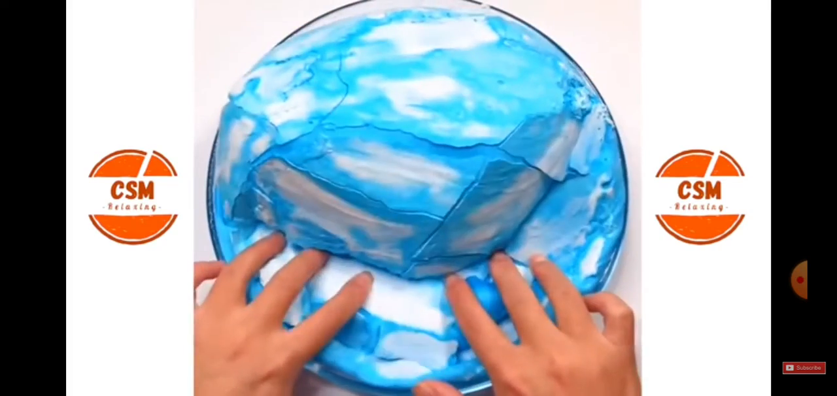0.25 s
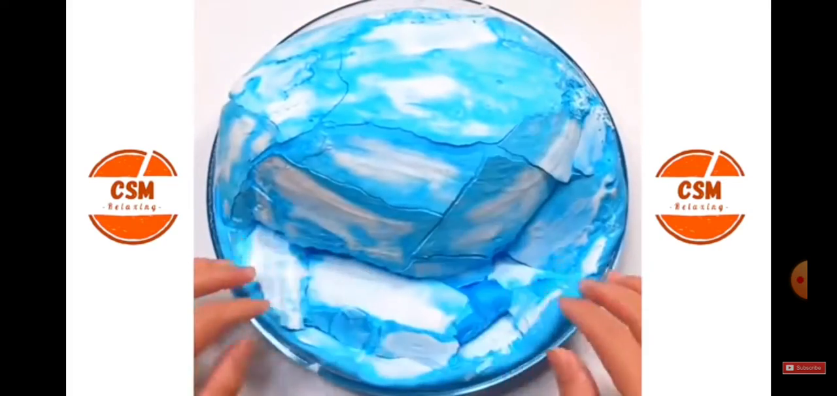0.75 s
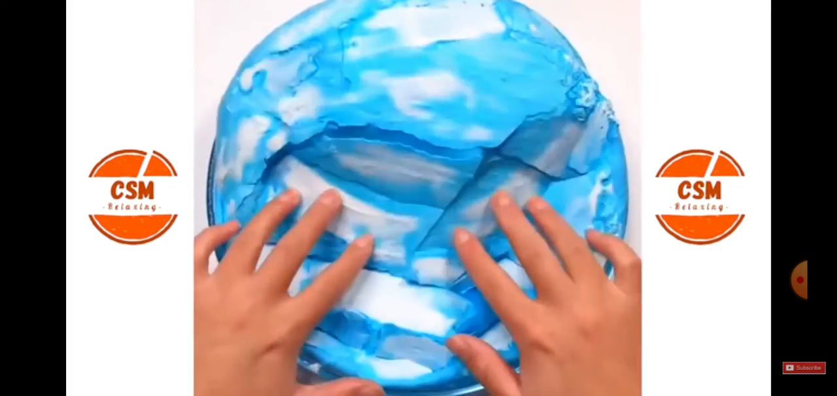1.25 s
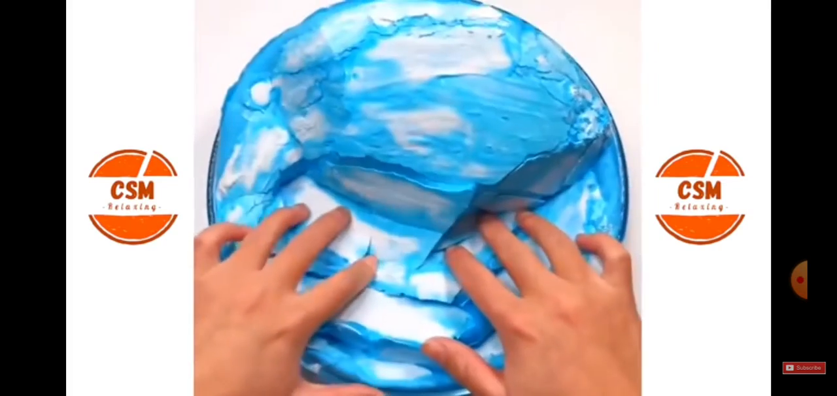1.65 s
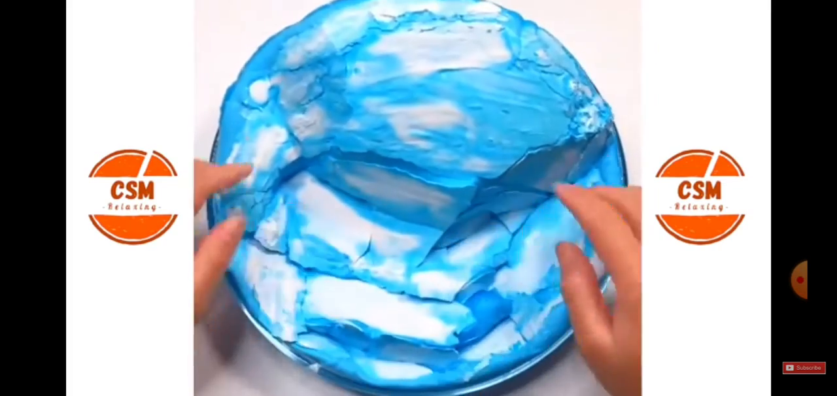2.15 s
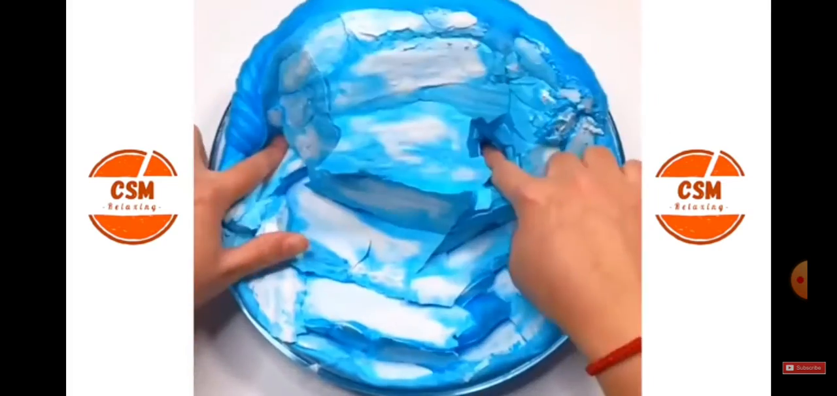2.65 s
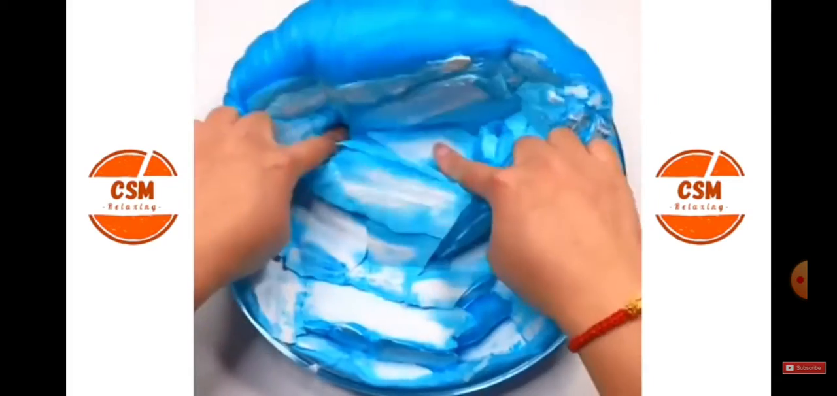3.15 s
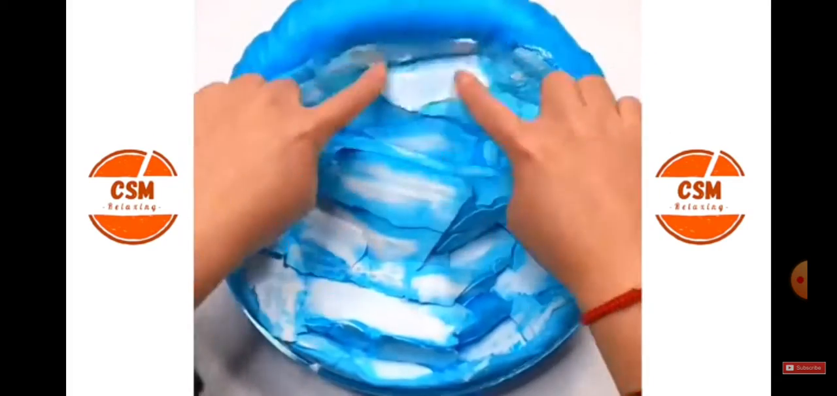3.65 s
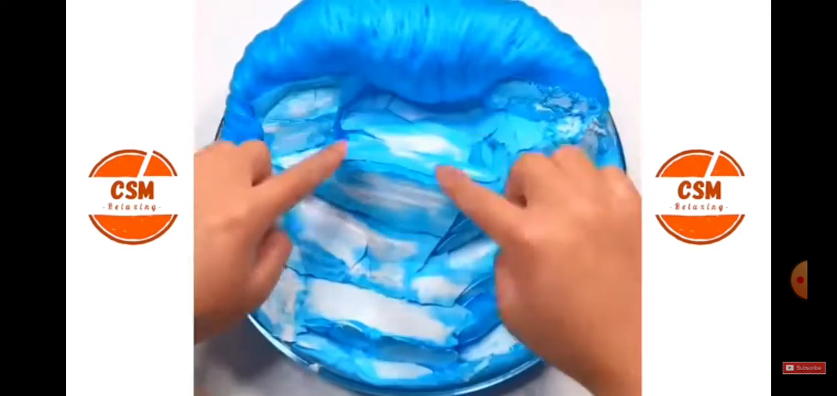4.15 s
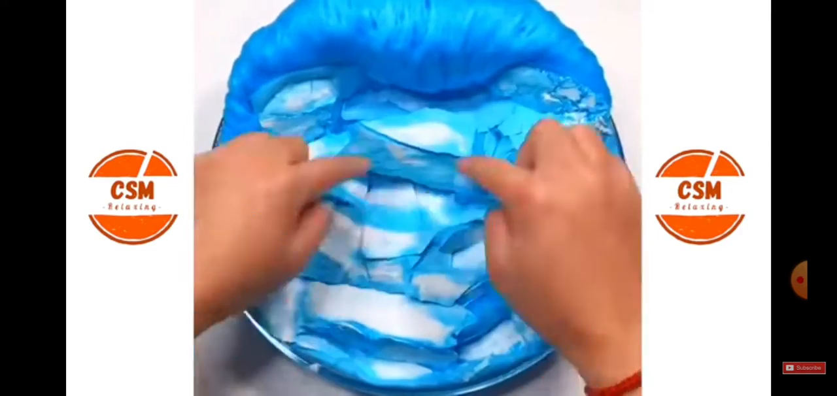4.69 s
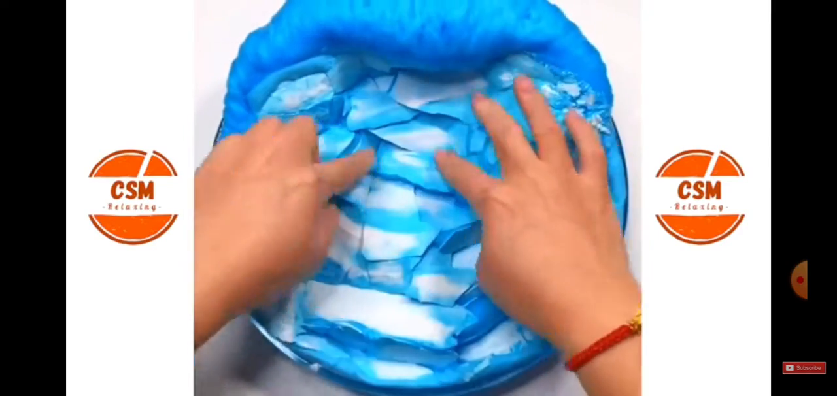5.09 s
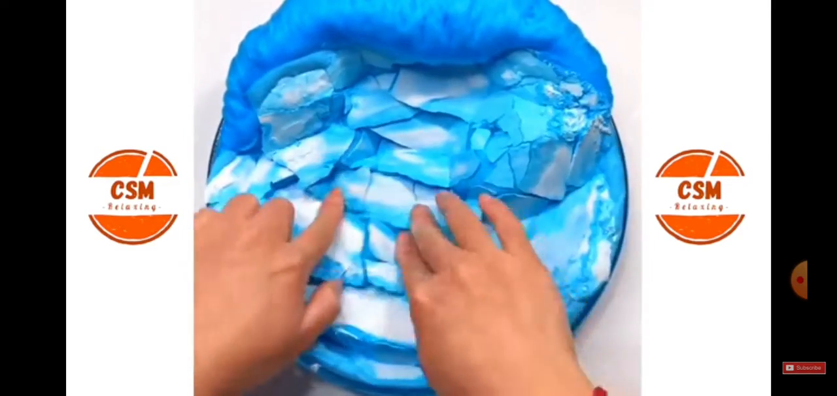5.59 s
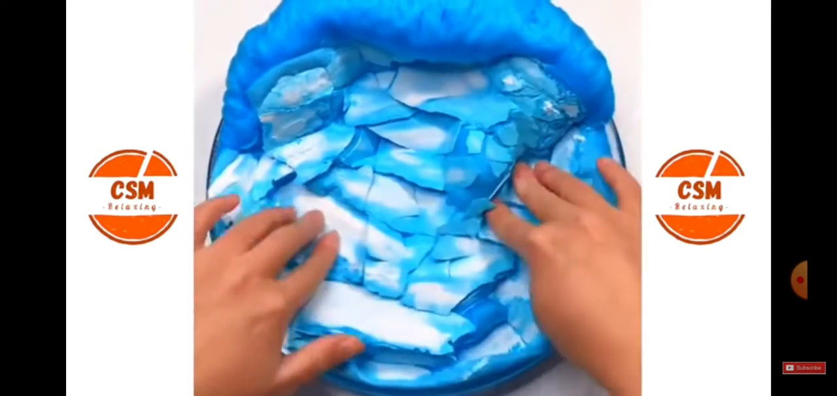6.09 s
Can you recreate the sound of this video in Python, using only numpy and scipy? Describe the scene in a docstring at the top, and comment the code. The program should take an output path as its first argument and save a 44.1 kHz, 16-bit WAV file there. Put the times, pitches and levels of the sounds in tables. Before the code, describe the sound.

Hands knead a bowl of crusted slime very close to the microphone. A dense flurry of snaps opens it, then calmer gaps with isolated squishes. From about 1.4 seconds crunchy clusters of pops return, thickening after three seconds. Each press brings a wet fizz of tiny bubbles and occasional hollow plops. The bowl rings faintly in a small room with low hum.

```python
"""Air pockets burst through crusted slime as fingers press and knead a bowl of it, close up in a small room.
Each pop is a tone that dives steeply from a snap to a hollow note; deep pockets give only round plops.
Every squeeze also crushes thousands of tiny bubbles, random grains summed into a fizz.
The bowl and the room ring along; filtered-noise air and rumble and a faint, wavering hum lie below.
A limiter holds the peaks."""
import sys
import numpy as np
from scipy import signal
from scipy.fft import rfft, irfft, next_fast_len
from scipy.io import wavfile
from scipy.ndimage import uniform_filter1d, minimum_filter1d

SR = 44100
rng = np.random.default_rng(int(sys.argv[2]) if len(sys.argv) > 2 else 0)


def int16_out(signal):
    """Quantize to a 16-bit WAV file."""
    q = np.round(np.clip(np.atleast_2d(signal).T, -1, 1) * 32767)
    wavfile.write(sys.argv[1], SR, q.astype(np.int16))


N = 279153
TIME = np.arange(N) / SR

# the loudest air pockets, before the trims in pops():
# [t/s, body level/dB, snap re body/dB, hollow tail re body/dB]
POCKETS = [(0.0177, -17, 5, -13), (0.0488, -12.5, -3, -26), (0.0638, -22, 6, -22), (0.0832, -6.5, 2, -12),
           (0.1121, -16, 2, -20), (0.1269, -11.5, 3, -17), (0.1569, -14.5, 3, -5), (0.1689, -12.5, -4, -4),
           (0.1768, -9, 14, -17), (0.2029, -20.5, 16, -1), (0.3153, -20.5, -9.5, -26),
           (0.3755, -20.5, -2, -10), (0.39, -15, 1, -9), (0.4225, -19.5, 1, -3), (0.487, -15.5, -8, -7),
           (0.7844, -19.5, 6, -5), (1.1952, -26, -12.5, 0.5), (1.3247, -13, 0.5, 3),
           (1.4235, -20, 11.5, -4), (1.4415, -7.5, -18, -24), (1.4578, -9.5, -13, -11),
           (1.5171, -9, -16, -13), (1.5444, -2.5, 4, -21), (1.5658, -13, -1.5, -11), (1.603, -8.5, 3, -20),
           (1.7627, -23.5, -18, 1.5), (1.788, -8, 1, -5.5), (1.8279, -14.5, 2, -13),
           (1.8406, -12.5, 8.5, -2.5), (2.2229, -10.5, -15, -8), (2.2848, -14.5, -3.5, -27),
           (2.3828, -33.5, 4.5, -3), (2.595, -23, 1.5, 6), (2.6224, -23.5, 11, -6.5),
           (2.6364, -13, 1, -11.5), (2.6598, -20, 10, -16.5), (2.6675, -12, -1, -19),
           (2.687, -21.5, 8.5, -4), (2.7398, -13.5, 13, -21), (2.785, -13.5, 1, -10),
           (2.9611, -24.5, -7.5, -1), (3.0022, -13, -22, -21), (3.1998, -20.5, -4.5, 2),
           (3.2287, -9.5, -12.5, -4.5), (3.273, -10, 8, -23), (3.2854, -11, 7, -23), (3.303, -9, 4, -24),
           (3.327, -9.5, -18, -14), (3.4687, -13, -2, -4.5), (3.5747, -13, -31, -27),
           (3.6181, -13, 5, -3.5), (3.813, -8, -7.5, -18), (3.8917, -9, -4, -8), (3.912, -13.5, -29, -13.5),
           (3.919, -10.5, 5, -20), (3.9266, -12.5, 5, -8), (3.9845, -14.5, -16, -24.5),
           (4.023, -10.5, 8, -7.5), (4.4651, -14.5, -12, -3), (4.5434, -10.5, -5, -28),
           (4.5917, -7, 6, -16), (4.9462, -8.5, -8.5, -9.5), (4.9919, -10.5, 2, -5),
           (5.0165, -13, -0.5, -22), (5.0387, -10, -9, -13), (5.059, -8.5, -7, -11), (5.0839, -6, 3, -22),
           (5.0896, -15, -3, -11), (5.1339, -10.5, 6, -4), (5.5565, -9, -11, -12), (5.5747, -9.5, -4.5, -2),
           (5.6151, -10, -2, -12), (5.6574, -8, -0.5, -16), (5.859, -14, -5.5, -8), (6.1014, -8, -10, -13),
           (6.1459, -14, 14, -1), (6.1837, -11, 12, -4), (6.2358, -19.5, 5.5, -5)]
# deep pockets squeezed open: [t/s, level before trim/dB, pitch near the top of the swell f/Hz]
DEEP_POCKETS = [(0.43, -23.5, 453), (0.535, -31.5, 424), (0.689, -26, 404), (0.798, -26, 412),
                (1.472, -21.5, 299), (2.172, -32, 416.5), (2.236, -20.5, 372), (2.579, -28, 466),
                (2.597, -20.5, 342), (2.999, -19.5, 564), (3.043, -25, 362.2), (3.237, -20, 325),
                (3.277, -31, 350), (3.792, -19.5, 357.7), (4.238, -27, 374.5), (4.424, -23, 394.5),
                (4.461, -23, 377), (5.884, -26, 422), (6.062, -19.5, 423.7)]
# finger presses, levels before the trims in fizz():
# [t at full force/s, attack/s, hold/s, release/s, fizz level/dB, crispness re body/dB]
FINGER_PRESSES = [(0.01, 0.021, 0.031, 0.021, -23, -0.5), (0.066, .02, .12, 0.061, -26.5, -5.5),
                  (0.392, 0.024, 0.098, 0.093, -37, -6.5), (0.765, 0.019, 0.056, 0.033, -30.5, -0.5),
                  (1.328, 0.013, 0.08, .03, -36.5, -1.5), (1.405, .02, .012, 0.016, -26.5, 0.5),
                  (1.459, 0.023, 0.068, 0.019, -23.5, -2.5), (1.602, 0.024, 0.0497, .06, -28, -2),
                  (1.811, 0.019, 0.057, 0.066, -34, -2), (1.916, 0.0074, 0.0092, .015, -33, -13),
                  (2.217, .026, 0.022, 0.037, -24, -7), (2.467, 0.027, 0.023, 0.029, -44, 0.5),
                  (2.629, 0.026, 0.078, 0.032, -28.5, -1), (2.729, 0.021, .08, .033, -30.5, -9),
                  (3.006, 0.011, 0.0434, 0.016, -25, 2), (3.231, 0.0081, .03, 0.022, -25, -7),
                  (3.288, 0.0073, .025, 0.0298, -21.5, -1), (3.351, .02, 0.017, 0.114, -32, -3.5),
                  (3.605, .012, 0.0199, 0.018, -23.5, 0.5), (3.823, .016, .095, .012, -22.5, -2.5),
                  (3.948, 0.017, .04, 0.096, -30.5, -6.5), (4.187, 0.017, 0.043, .014, -27.5, -1.5),
                  (4.465, .016, .05, 0.035, -24, -4.5), (4.588, .02, 0.057, 0.033, -27, -4),
                  (4.819, 0.0085, .025, 0.015, -25, -3), (4.954, 0.0051, 0.022, 0.021, -33.5, -8),
                  (5.026, 0.011, .11, 0.044, -28, -5.5), (5.266, 0.0081, 0.0342, .014, -24.5, -5.5),
                  (5.56, .022, 0.067, 0.034, -26.5, -4.5), (5.67, .02, 0.027, 0.074, -31, -3.5),
                  (5.867, .018, 0.0184, 0.019, -26, 1), (6.027, 0.0069, 0.061, 0.021, -27.5, -2.5),
                  (6.105, .015, 0.0438, 0.022, -25.5, 0), (6.198, .02, 0.032, 0.049, -29, -3.5)]
# tone curve of the slime at the microphone: [f/Hz, relative level/dB]
SLIME_COLOUR = [(100, -22), (195, -6), (236, -2.5), (380, 4.5), (580, -1), (790, 1.5), (950, 0.5),
                (1500, 5), (2350, 2), (2900, -9.5), (4400, -1), (6700, -5.5), (9800, -31.5), (15500, -27.5)]
# resonances of the bowl: [f/Hz, width/Hz, level added to the direct sound/dB]
BOWL_MODES = [(237.7, 11, -2.5), (330.4, 11, -6), (809.4, 15, -3.5), (1420, 13, -38), (4500, 14, -46)]
# tone curve of the room air: [f/Hz, relative level/dB]
AIR_COLOUR = [(22, -40), (45, -3), (70, -22), (140, 9), (220, -7.5), (380, -13), (800, -8), (1800, 2),
              (2900, -9.5), (4300, -2), (6300, -9.5), (9500, -51), (16000, -56)]
# rumble of the bowl under the hands: [t/s, level/dB]
RUMBLE_LEVEL = [(0, -79), (1.2, -82), (1.5, -49.5), (2.1, -72), (2.7, -56.5), (3.4, -54), (4.2, -64),
                (6.3, -76)]
# hum tones: [f/Hz, level around which it wavers/dB]
HUM_TONES = [(100.8, -54.5), (71, -66)]

SQUELCH_HZ, CRISP_HZ = 700, 2900  # splits between hollow lows, body and crisp highs
TOP_HZ = 16000  # upper limit of the finished sound
GLIDE_MS, GLIDE_SPREAD = 0.23, 0.1935  # how fast a pocket's pitch dives; its scatter (natural log)
STRAY_PER_S, STRAY_OVER_DB = 14, 7.5  # lesser pockets under a firm press: rate, level above the fizz
STRAY_SNAP_DB, STRAY_TAIL_DB, STRAY_SPREAD_DB = -4, -7, 2.5  # spread is either way
FIRM_DB = -28  # fizz level of a firm press
SQUELCH_DB, DRAIN_DB, DRAIN_S = -3, -6.5, 0.046  # lows as a finger lands; how far and fast they drain
# the foam settling by itself: body, its drift, highs and lows re body
REST_DB, REST_WANDER_DB, REST_CRISP_DB, REST_SQUELCH_DB = -53, 3, 1, 7


def undb(db):
    """Decibels to gain."""
    return 10 ** (np.asarray(db) / 20)


def unit(x):
    """Scale to rms 1."""
    return x / np.sqrt(np.mean(x ** 2) + 1e-18)


def walk(rate):
    """Random drift with a spread near 1: straight lines between random points, rate per second."""
    knots = rng.standard_normal(int(N / SR * rate) + 2)
    return np.interp(TIME * rate, np.arange(len(knots)), knots)


def colour(x, points):
    """Minimum-phase (causal) filter that follows (Hz, dB) points."""
    hz, db = np.transpose(points)
    size = next_fast_len(2 * len(x))
    grid = np.arange(size // 2 + 1) * SR / size
    curve_db = np.interp(np.log(grid + 1), np.log(hz), db)
    cepstrum = irfft(np.log(undb(curve_db)), size)
    # folding the cepstrum forward in time makes the filter causal
    cepstrum[1:size // 2] *= 2
    cepstrum[size // 2 + 1:] = 0
    return irfft(rfft(x, size) * np.exp(rfft(cepstrum)), size)[:len(x)]


def lowpass(x, hz):
    """Zero-phase low-pass."""
    return signal.sosfiltfilt(signal.butter(4, hz, fs=SR, output="sos"), x, padtype=None)


def registers(x):
    """Split into hollow lows, body and crisp highs, which sum to the whole."""
    low = lowpass(x, SQUELCH_HZ)
    upto = lowpass(x, CRISP_HZ)
    return low, upto - low, x - upto


def burst(glide_ms, ring_ms, start_hz=7000, sag=.85, fade=0.84, overtone=0.35, tear=0.23, tear_ms=10.0):
    """One bubble: its skin tears and slackens, so the pitch dives from a snap to a hollow note."""
    ms = np.arange(2 ** 11) / SR * 10 ** 3
    slack = 1 + ms / glide_ms
    turns = np.cumsum(start_hz * slack ** -sag + 70 * rng.random()) / SR
    skin = np.sin(2 * np.pi * turns)
    upper = overtone * np.sin(2 * np.pi * turns * (2 + rng.random())) * np.exp(-ms / 9.3)
    rip = tear * rng.standard_normal(len(ms)) * np.exp(-ms / tear_ms)
    onset = 1 - np.exp(-ms / 0.066)
    return (skin + upper + rip) * slack ** -fade * np.exp(-(ms / ring_ms) ** 2) * onset


def shreds(wave, count=2, share=.4, within_s=.004):
    """The torn skin snaps again, more weakly, just after the burst."""
    out = wave
    for when, size, glide in rng.random((count, 3)):
        lag = int(when * within_s * SR)
        snap = burst(0.0797 + 0.079 * glide, ring_ms=4.2)
        out = out + share * size * np.pad(snap, (lag, 0))[:len(wave)]
    return out


def pocket(wave, count=4, low_hz=900, high_hz=6000, share=1.1, cycles=3):
    """The open cavity rings briefly at a few pitches of its own."""
    t = TIME[:2 ** 9]
    response = 1. * (t == 0)  # the direct sound
    for place in (np.arange(count) + rng.random(count)) / count:
        hz = low_hz * (high_hz / low_hz) ** place
        decay = np.exp(-t * hz / cycles)
        ring = np.cos(2 * np.pi * (hz * t + rng.random()))
        response = response + 2 * share * decay / decay.sum() * ring
    return np.convolve(wave, response)[:len(wave)]


def pops(rows, body_db=-3, snap_db=-3, tail_db=-3, muffle=0.22):
    """Bursting air pockets: random glides, with the body, snap and hollow tail levelled apart."""
    lead, span = 128, 100  # samples: room ahead of the burst; length over which its level counts
    out = np.zeros(N + 2 ** 13)
    for s, db, snap, tail in rows:
        glide_ms = GLIDE_MS * np.exp(GLIDE_SPREAD * rng.standard_normal())
        wave = pocket(shreds(burst(glide_ms, ring_ms=11.4)))
        wave = colour(np.pad(wave, (lead, 0)), SLIME_COLOUR)
        # a pocket buried in the slime has little snap and loses its very top too
        wave = colour(wave, [(4800, 0), (8000, muffle * min(snap, 6))])
        gains = undb(db + np.array([tail + tail_db, body_db, snap + snap_db]))
        parts = registers(wave)
        wave = sum(g * part * np.sqrt(span / np.sum(part ** 2)) for g, part in zip(gains, parts))
        start = max(int(s * SR) - lead, 0)
        out[start:start + len(wave)] += wave
    return out[:N]


def strays(press_db):
    """Lesser pockets give way at random, likelier under a firm press: rows like those of POCKETS."""
    chance = rng.random((int(STRAY_PER_S * N / SR), 5))
    rows = []
    for when, luck, *spread in chance:
        db = press_db[int(when * N)]
        if luck < undb(db - FIRM_DB):
            usual = np.array([db + STRAY_OVER_DB, STRAY_SNAP_DB, STRAY_TAIL_DB])
            varied = usual + STRAY_SPREAD_DB * (2 * np.array(spread) - 1)
            rows.append((when * N / SR, *varied))
    return rows


def plops(swell_s=0.006315, sag=0.29, gain_db=-1):
    """Deep pockets open without a snap: only the round, falling note gets out."""
    t = TIME[:2 ** 11]
    age = t / swell_s
    swell = age * np.exp((1 - age ** 2) / 2)  # peaks at 1 when age is 1
    out = np.zeros(N + len(t))
    for s, db, hz in DEEP_POCKETS:
        turns = np.cumsum(hz * ((age + .5) / 1.45) ** -sag) / SR
        start = int(s * SR)
        out[start:start + len(t)] += undb(db + gain_db) * np.sqrt(2) * swell * np.sin(2 * np.pi * turns)
    return out[:N]


def kneading():
    """Fizz dB of lows, body, highs: a press swells, holds and relaxes, squelching most as it lands."""
    rest = undb(REST_DB + REST_WANDER_DB * walk(12))
    power = (rest * undb([[REST_SQUELCH_DB], [0], [REST_CRISP_DB]])) ** 2
    for s, attack, hold, release, db, crisp in FINGER_PRESSES:
        age = TIME - s
        shape = np.exp(np.minimum(age, 0) / attack - np.maximum(age - hold, 0) / release)
        body = undb(db) * shape
        squelch = SQUELCH_DB + DRAIN_DB * (1 - np.exp(-np.maximum(age, 0) / DRAIN_S))
        power = power + np.array([body * undb(squelch), body, body * undb(crisp)]) ** 2
    return 10 * np.log10(power)


def bursts(rate, spread_db):
    """Random instants at a given rate per second: many small sizes, a few large ones."""
    fired = np.flatnonzero(rng.random(N) < rate / SR)
    size_db = spread_db * np.minimum(rng.exponential(size=len(fired)), 2)
    train = np.zeros(N)
    train[fired] = undb(size_db) * rng.choice([-1, 1], len(fired))
    return train


def ringing(rate, count=28):
    """Closed bubbles, heavily damped by the slime: a few cycles each."""
    t = TIME[:2 ** 10]
    out = np.zeros(N)
    for hz in 600 * 4 ** ((np.arange(count) + rng.random(count)) / count):  # over two octaves
        note = np.sin(2 * np.pi * hz * t) * np.exp(-t * hz / 5)
        out += signal.oaconvolve(bursts(rate / count, 4), unit(note))[:N]
    return out


def folds(x, count=32, patchy_db=7, rate=75):
    """Folds of slime open and close over the foam, so its colour shifts from grain to grain."""
    size = next_fast_len(N)
    place = np.log2(np.arange(size // 2 + 1) * SR / size + 1)
    centres = np.linspace(np.log2(240), np.log2(7500), count)
    spectrum = rfft(x, size)
    # overlapping bands, each with a drifting level
    bands = (irfft(spectrum * np.interp(place, centres, one), size)[:N] for one in np.eye(count))
    return sum(band * undb(patchy_db * np.tanh(walk(rate))) for band in bands)


def fizz(levels, rest_rate=1700, press_rate=300, spread_db=3.5,
         body_db=-1.13, crisp_db=-0.4, squelch_db=-1.42, clump_db=1.28):
    """Tiny bubbles of many sizes; the harder the squeeze, the more of them burst each second."""
    force = undb(levels[1] - levels[1].max())
    rate = rest_rate + press_rate * force
    glides_ms = np.geomspace(.06, .45, num=14)
    torn = np.zeros(N)
    for glide_ms in glides_ms:
        grain = unit(burst(glide_ms, ring_ms=10.3))
        torn += signal.oaconvolve(bursts(rate / len(glides_ms), spread_db), grain)[:N]
    # dividing by the root of the rate leaves the loudness to the levels
    cloud = (unit(torn) + 0.53 * unit(ringing(rate / 5))) / np.sqrt(rate)
    parts = registers(colour(folds(cloud), SLIME_COLOUR))
    trims = (squelch_db, body_db, crisp_db)
    # under pressure the foam gives way in clumps
    clumps = undb(clump_db * np.sqrt(force) * walk(160))
    return clumps * sum(unit(part) * undb(db + trim) for part, db, trim in zip(parts, levels, trims))


def bowl(x):
    """The bowl rings faintly along with everything inside it: resonators beside the direct sound."""
    out = x
    for hz, width, db in BOWL_MODES:
        b, a = signal.iirpeak(hz, hz / width, fs=SR)
        out = out + undb(db) * signal.lfilter(b, a, x)
    return out


def room(x, t60=0.51, wet_db=-10, build_s=0.0011):
    """A small bare room: a short diffuse tail of decaying noise, weak in the bass."""
    t = TIME[:SR // 2]
    tail = rng.standard_normal(len(t)) * undb(-60 * t / t60) * (1 - np.exp(-t / build_s))
    tail = colour(tail, [(150, -9.5), (500, 2), (1500, -6.5), (2800, -4.5),
                         (4500, -7), (9000, -9), (15000, 5.0)])
    tail = tail / np.sqrt(np.sum(tail ** 2))
    return x + undb(wet_db) * signal.fftconvolve(x, tail)[:N]


def background(air_db=-53):
    """Soft room air and the bowl's faint rumble, both filtered noise, over a wavering hum of sines."""
    air = unit(colour(rng.standard_normal(N), AIR_COLOUR)) * undb(air_db + walk(6.6))
    rumble = unit(colour(rng.standard_normal(N), [(22, -30), (30, -14), (42, -5), (90, -10),
                                                  (170, -7), (400, -45), (2000, -80)]))
    rumble_db = np.interp(TIME, *np.transpose(RUMBLE_LEVEL))
    hum = np.zeros(N)
    for hz, db in HUM_TONES:
        tone = np.sin(2 * np.pi * hz * TIME + .5 * walk(7))
        hum += undb(db + 2.8 * walk(11)) * unit(tone)
    return air + hum + rumble * undb(rumble_db)


def scene():
    """The presses drive the fizz and the lesser pops; all the slime rings in the bowl and the room."""
    levels = kneading()
    slime = pops(POCKETS) + pops(strays(levels[1])) + plops() + fizz(levels)
    return (room(bowl(slime)) + background())[None]


def record(dry):
    """A limiter ducks the sharpest pops for about a millisecond each; the top is cut."""
    ceiling = .7
    cut = np.minimum(ceiling / np.maximum(np.abs(dry), ceiling), 1)
    # the gain dips 40 samples ahead of a peak and returns 40 samples after it
    gain = uniform_filter1d(minimum_filter1d(cut, size=41), size=41)
    return signal.sosfilt(signal.ellip(8, .2, 70, TOP_HZ, fs=SR, output="sos"), dry * gain)


dry = scene()
out = record(dry)
int16_out(out)
```